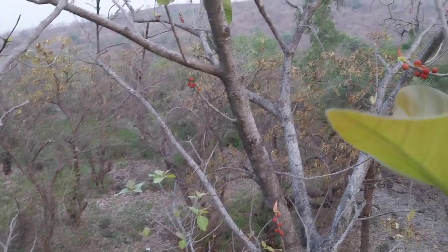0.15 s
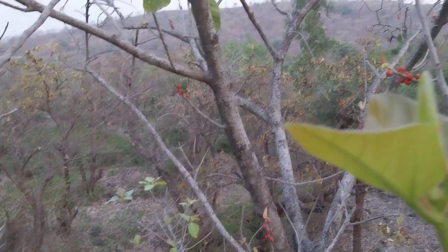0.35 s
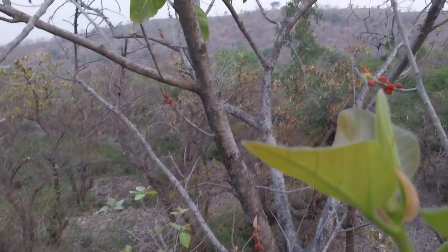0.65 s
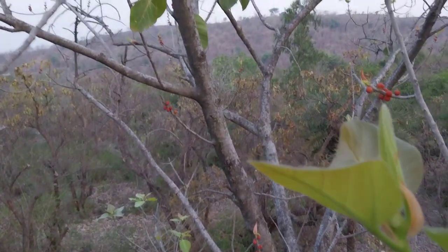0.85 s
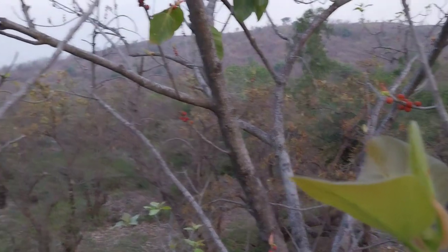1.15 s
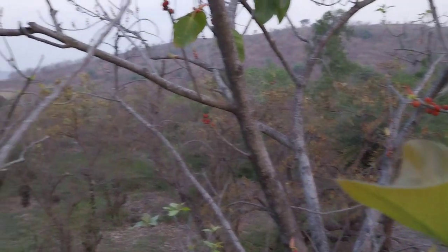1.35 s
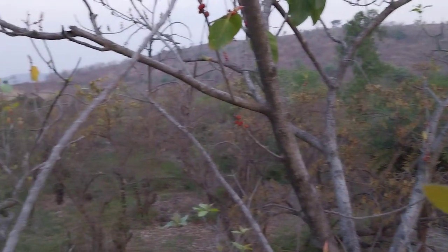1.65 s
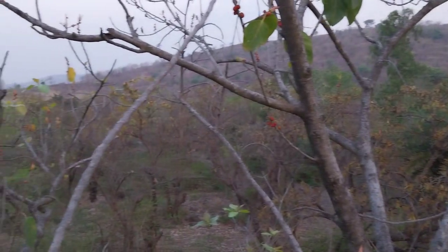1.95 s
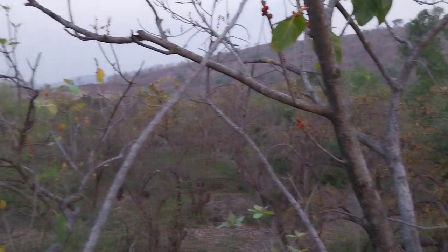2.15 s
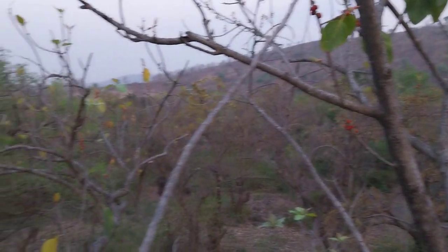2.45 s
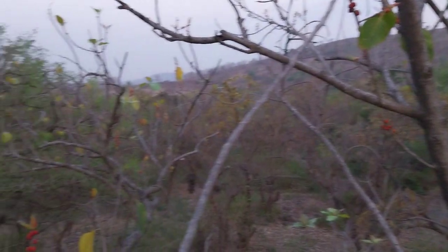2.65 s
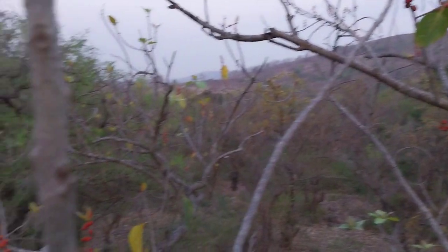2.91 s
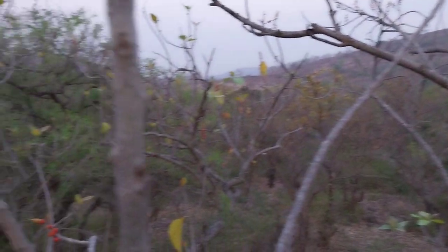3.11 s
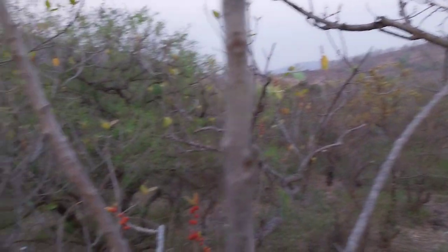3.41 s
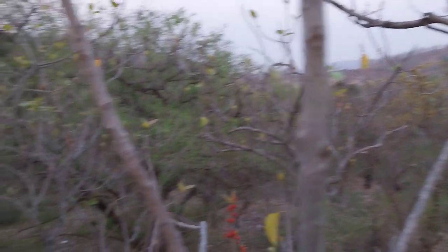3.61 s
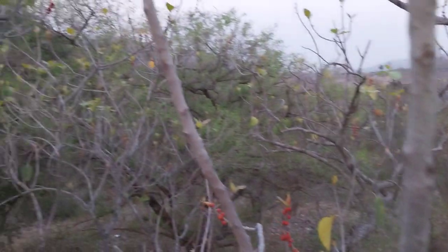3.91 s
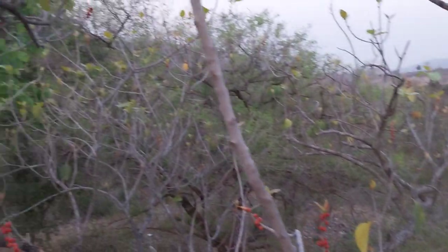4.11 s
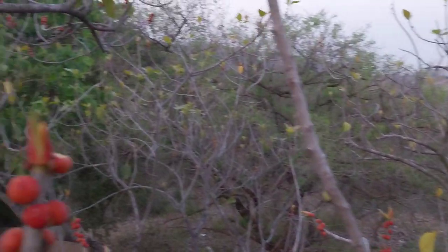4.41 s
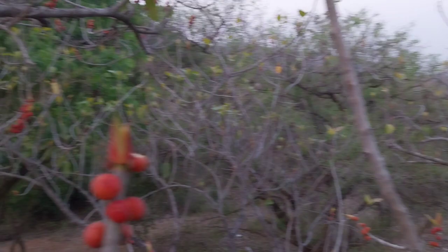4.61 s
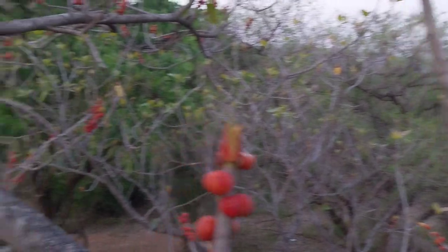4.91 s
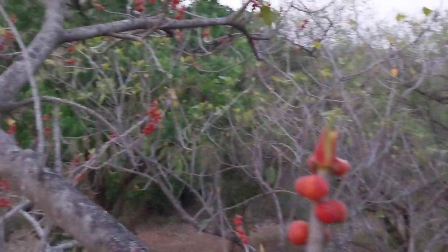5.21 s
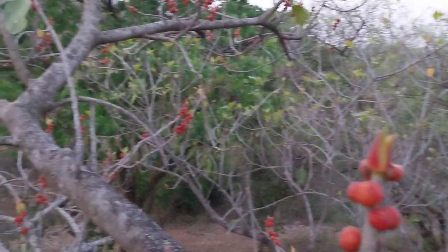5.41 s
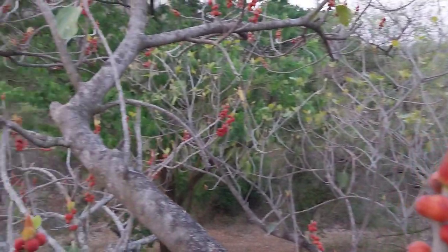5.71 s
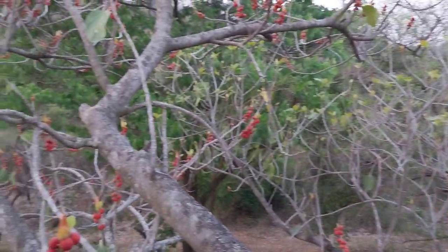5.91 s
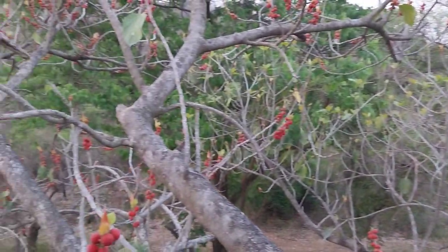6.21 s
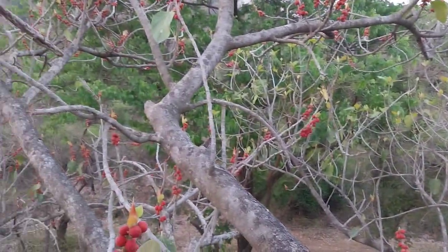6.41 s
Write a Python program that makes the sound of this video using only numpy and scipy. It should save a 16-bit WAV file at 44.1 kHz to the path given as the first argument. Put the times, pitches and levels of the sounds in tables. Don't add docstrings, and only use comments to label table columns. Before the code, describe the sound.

A near bird whistles five arched notes, then many small birds chirp over scrub woodland; later a finger rubs the microphone and taps click.

```python
import sys
import numpy as np
from scipy import signal
from scipy.fft import rfft, irfft, next_fast_len
from scipy.io import wavfile
from scipy.ndimage import uniform_filter1d, map_coordinates

SR = 44100
rng = np.random.default_rng(int(sys.argv[2]) if len(sys.argv) > 2 else 0)


def gain_from_db(level_db):
    decades = np.asarray(level_db, float) / 20
    return 10 ** decades


def wav_record(signal):
    frames = np.transpose(np.atleast_2d(signal))
    bounded = np.clip(frames, -1, 1)
    quanta = np.round(bounded * 32767).astype(np.int16)
    wavfile.write(sys.argv[1], SR, quanta)


N = 288855

# [f/Hz, level per Hz/dB]
AIR_COLOUR = [(15, -60), (30, -22), (45, -2), (72, 5.5), (216, 0.5), (371, -9), (1120, -18), (3050, -24),
              (3880, -5), (5980, -15), (7630, -21), (8270, -38), (9700, -33), (11100, -23), (15800, -31)]
# [t/s, peak level/dB]
PUFFS = [
    [(.018, -44), (.06, -45.5), (.097, -57), (.15, -42), (.179, -44.5), (.264, -55), (.89, -57),
     (4.91, -51.5), (4.943, -44), (4.978, -50.5), (5.04, -46.5), (5.085, -41), (5.108, -41.5), (5.132, -48),
     (5.15, -54), (5.176, -57), (5.34, -56.5), (5.229, -57), (5.259, -50), (5.291, -57)],
    [(.825, -52), (.971, -50), (1.033, -47.5), (1.086, -47), (1.125, -54), (2.86, -57), (4.996, -49.5),
     (5.029, -46.5), (5.062, -42), (5.245, -52), (5.47, -57), (6.22, -54)],
]
# [t/s, level/dB]
BREEZE = [
    (0, -59),
    (.3, -67),
    (.6, -73),
    (5.55, -91.5),
    (5.65, -73),
    (6.55, -74.5),
]
# [f/Hz, level per Hz/dB]
DRAUGHT_COLOUR = [(22, -20.5), (40, 4.5), (120, -1), (350, -5), (700, -20.5), (1500, -63.5)]
# [t/s, level/dB]
CHORUS = [(0, -54.5), (.6, -64.5), (1.0, -59.5), (1.6, -59.5), (2.4, -60), (3.0, -65.5), (3.25, -68),
          (3.5, -69.5), (3.9, -72), (4.02, -63.5), (4.55, -62), (5.0, -58), (5.45, -62.5), (5.9, -69),
          (6.1, -63.5), (6.55, -63)]
# [f/Hz, level per Hz/dB]
FLOCK_COLOUR = [(760, -76), (1300, -30.5), (1660, -3.5), (2840, -3.5), (3340, -11.5), (3740, -1),
                (5680, -15), (6180, -22), (8000, -58), (10400, -83), (17600, -120)]
# [f/Hz, time to fade by 60 dB/s]
TREES = [(500, 0.77), (2500, 0.5), (7000, 0.53), (12000, 0.037)]
GLIDES = {"rise": (.73, 1.29), "swoop": (.86, 1.38), "climb": (.85, 1.0), "lift": (.95, 1.03),
          "level": (1.01, 1.0), "arch": (.76, .82), "droop": (1.08, .95), "scoop": (1.3, .94),
          "fall": (1.3, .76), "drop": (1.1, .71), "coo": (.97, .98), "ascend": (.86, 1.14),
          "hump": (.94, .94), "slide": (1.18, .82), "dive": (1.55, .82), "tip": (1.02, .75),
          "settle": (1.4, .88)}
DOVE = {"coo": [(.3, 0.45, 606, -88.5), (.97, 0.051, 617, -77.5), (1.05, 0.55, 689, -87),
        (1.5, 0.3, 599, -85), (2.13, 0.081, 566, -77.5), (2.36, 0.058, 610, -73), (2.44, 0.05, 624, -79.5),
        (2.53, 0.071, 619, -75.5), (2.65, 0.056, 645, -81), (2.79, 0.072, 621.5, -77),
        (2.92, 0.074, 605, -80.5)]}
HOARSE = {"climb": [(1.471, 0.081, 2002, -53), (1.539, 0.061, 2147, -51), (6.075, 0.0374, 2532, -54.5),
          (6.312, 0.088, 1940, -58.5)], "lift": [(1.713, .032, 2014, -54), (2.201, .033, 2210, -56.5),
          (2.717, 0.088, 2346, -58.5), (6.421, 0.059, 2710, -63.5)], "level": [(2.04, 0.099, 1790, -72),
          (4.229, 0.16, 1822, -71), (5.21, 0.18, 2132, -64.5), (6.39, 0.093, 1767, -59.5),
          (3.3, .09, 2310, -68.5), (1.27, .09, 2250, -58), (1.38, .03, 3000, -58), (1.84, .06, 2250, -59),
          (3.98, .05, 2250, -64), (3.385, 0.032, 3200, -64.5), (4.085, 0.044, 2375, -71),
          (5.8, 0.047, 2103, -69.5), (6.524, .012, 2030, -58)], "droop": [(.985, 0.032, 3260, -52.5),
          (5.663, 0.079, 2780, -60)], "arch": [(1.68, 0.077, 2265, -60)], "scoop": [(1.6, .09, 1567, -66.5),
          (7.4, 0.066, 2200, -52), (3.3, .065, 3100, -62), (6.48, 0.073, 1430, -71)]}
THIN = {"arch": [(.252, .02, 5900, -66), (.8, .039, 5650, -59)], "climb": [(.792, 0.035, 5290, -59.5),
        (6.003, 0.045, 3580, -60)], "level": [(1.088, .028, 5500, -53), (.94, .028, 5400, -58),
        (2.117, 0.016, 6580, -54), (2.319, 0.017, 6500, -55.5), (2.883, 0.019, 5170, -49),
        (2.996, 0.014, 4350, -53), (3.165, .04, 4040, -61), (3.043, 0.011, 5200, -49),
        (5.065, 0.013, 5580, -53), (5.08, 0.015, 4020, -48), (5.635, 0.013, 5350, -54.5),
        (3.983, .02, 4470, -57), (5.75, 0.1, 3900, -75.5), (5.915, .06, 3760, -74)],
        "rise": [(2.87, 0.008, 6760, -64), (2.98, 0.0105, 6730, -60.5)],
        "swoop": [(6.374, .048, 4800, -63)], "droop": [(1.761, 0.082, 6610, -61), (5.648, .06, 3900, -57)]}
FAR_RIGHT = {"rise": [(2.687, 0.034, 3600, -60), (3.551, 0.073, 3280, -68)],
             "swoop": [(1.825, 0.027, 3000, -60), (3.133, 0.033, 2920, -64)],
             "climb": [(5.969, 0.084, 2550, -66)], "arch": [(.152, 0.028, 3850, -50)],
             "lift": [(.798, 0.049, 3820, -50.5), (2.192, .063, 3700, -64.5), (4.383, 0.023, 2742, -60.5)],
             "level": [(5.441, 0.013, 2580, -65), (5.869, 0.016, 1990, -59.5)],
             "droop": [(2.14, 0.013, 2190, -35), (2.871, 0.037, 2890, -64), (3.548, 0.0467, 3950, -66)],
             "scoop": [(1.573, 0.051, 3105, -58.5), (3.583, 0.056, 3225, -58)],
             "fall": [(.12, 0.041, 4840, -64), (4.412, 0.039, 3410, -52.5)],
             "tip": [(4.008, 0.026, 3337, -48.5)]}
SETTLING = {"settle": [(3.72, .1, 3075, -64.5)], "scoop": [(1.995, 0.087, 3010, -57)],
            "droop": [(3.835, .14, 3750, -71.5), (3.85, 0.13, 3066, -65.5)]}
RIGHT = {"rise": [(2.525, .074, 5000, -51.5), (2.732, 0.074, 4620, -46.5), (2.909, 0.019, 4400, -48.5),
         (3.021, 0.028, 4520, -54)], "swoop": [(2.232, .05, 2806, -66)],
         "climb": [(1.468, .075, 1931, -52.5), (1.853, 0.036, 2890, -56), (2.473, .037, 6760, -53),
         (2.679, .04, 6610, -54.5)], "level": [(2.168, 0.023, 2530, -52), (4.345, 0.031, 5510, -66.5),
         (5.523, 0.025, 4570, -69.5)], "droop": [(3.342, 0.036, 2780, -67), (5.116, 0.074, 3110, -72)],
         "scoop": [(2.413, 0.03, 3304, -56.5), (2.927, 0.015, 5480, -50.5)],
         "fall": [(2.076, 0.038, 2500, -58), (5.017, 0.014, 2770, -63)], "drop": [(5.29, 0.089, 3660, -64)]}
WAVERING = {"ascend": [(3.0, .028, 4990, -57)], "climb": [(.425, 0.027, 4240, -66.5),
            (6.012, 0.0355, 4850, -63.5)], "hump": [(.947, .02, 5480, -51.5), (1.09, 0.022, 5575, -50),
            (1.088, .012, 5250, -53), (1.1, .014, 5300, -53), (.936, .014, 5300, -59)],
            "arch": [(3.965, 0.022, 5780, -63)], "level": [(.54, 0.099, 4100, -66.5),
            (2.026, 0.01, 2200, -61.5), (2.768, 0.01, 2300, -54), (3.08, 0.027, 2720, -70.5),
            (4.052, .012, 3350, -66), (6.135, 0.036, 6200, -74), (4.26, 0.046, 1650, -70.5),
            (5.785, 0.024, 3020, -73)], "droop": [(.45, .06, 3980, -61.5), (3.137, 0.0254, 4210, -62.5),
            (3.78, .06, 4530, -75.5)], "slide": [(2.8, 0.036, 4900, -55), (2.838, 0.037, 3250, -56),
            (0.12, 0.036, 4250, -63.5)], "fall": [(3.2, 0.027, 3260, -62.5)],
            "dive": [(6.047, 0.032, 3180, -55)]}
# [t of hook/s, slur level/dB, hook level/dB]
PHRASES = [
    (1.722, -45, -41.5),
    (1.919, -46.5, -40.5),
    (2.123, -46.5, -42.5),
    (2.326, -49, -43),
]
AHEAD = {"droop": [(.487, 0.051, 3840, -47.5), (5.61, 0.027, 4140, -59), (6.465, 0.09, 4450, -62.5)],
         "lift": [(4.151, .12, 5770, -69.5), (6.119, 0.058, 2930, -56)]}
# [t of peak/s, level up/dB, level down/dB]
SPIRES = [
    (1.218, -43, -47.5),
    (1.376, -41, -43),
    (1.525, -45.5, -45.5),
]
# [t/s, peak level/dB, extra level of the knock/dB, left over right/dB]
TICKS = [
    (5.034, -42, -17, 19),
    (5.083, -64, 11, 13),
    (5.261, -66.5, 8.5, 4),
    (5.6063, -33.5, 10.5, 43),
    (6.2072, -66, 6, 14),
]
# [t/s, length/s, level/dB]
SCRATCHES = [
    (6.204, .02, -41),
    (5.608, .005, -41),
    (5.031, .003, -45),
    (5.32, .04, -68),
    (5.47, .06, -70),
]
# [f/Hz, width/Hz, level/dB]
SHELL = [(370, 220, -9), (1940, 330, 10.5), (3450, 860, 9.5), (5250, 1170, 8), (12460, 3700, -7.5)]
# [t/s, level/dB]
RUB = [
    (4.585, -64),
    (4.6, -49.5),
    (4.65, -46.5),
    (4.68, -35.5),
    (4.765, -28.5),
    (4.81, -33.5),
    (4.9, -37.5),
    (4.96, -35),
    (4.985, -52),
]
# [t/s, level/dB]
DRAG = [
    (4.999, -57.5),
    (5.04, -48.5),
    (5.09, -60.5),
    (5.13, -68),
]
# [f/Hz, level per Hz/dB]
SKIN_COLOUR = [(88, -21), (150, -12), (438, -13), (532, -17), (598, -13), (2080, 0.5), (3740, 0),
               (5520, 2.5), (8470, -7.5), (11800, 4), (15800, 3.5)]
# [t/s, top f/Hz, level/dB]
WHISTLES = [
    (.010, 2640, -41),
    (0.346, 2591, -39),
    (.668, 2568, -39),
    (0.972, 2535, -39.5),
    (1.239, 2601, -42),
]
# [multiple of the pitch, level/dB]
OVERTONES = [(2, -43.5), (3, -45.5), (5, -41.5), (6, -49)]
STRAIN = [(-0.5, 3, 8), (4, 8.5, 1), (-0.5, -7, 1), (-2.5, -8, 0), (-2.5, -6, 3.5)]
# [share of length, level/dB]
EFFORT = [(0, -15.5), (.1, -1.5), (.38, -0.5), (.5, 0.5), (.75, 0), (1, 0)]
CATCHES = [.056, .417, .748, 1.06, 1.29]
# [t/s, top f/Hz, level/dB]
FLICKS = [
    (0.188, 3420, -44.5),
    (.514, 3530, -45),
    (.835, 3570, -45.5),
    (1.122, 3585, -47.5),
    (1.377, 3210, -49.5),
]
# [f/Hz, level per Hz/dB]
CONVERTER_COLOUR = [(1500, -45.5), (4000, -10.5), (7300, -1.5), (8300, -41), (9700, -28), (11500, -7.5),
                    (15500, -5.5)]


def unit(x):
    return x / np.sqrt(np.mean(x ** 2) + 1e-20)


def along(points, hz):
    f, v = np.transpose(points)
    return np.interp(np.log(hz + 1), np.log(f + 1), v)


def curve(rows):
    s, values = np.transpose(rows)
    return np.interp(np.arange(N) / SR, s, values)


def gate(rows, edge):
    start, end = rows[0][0], rows[-1][0]
    return np.interp(np.arange(N) / SR, [start, start + edge, end - edge, end], [0, 1, 1, 0])


def wobble(rate):
    knots = rng.standard_normal(int(N * rate / SR) + 4)
    return map_coordinates(knots, [np.arange(N) * rate / SR])


def filtered(x, response):
    m = next_fast_len(N + SR // 2)
    return irfft(rfft(x, m) * response(np.fft.rfftfreq(m, 1 / SR)), m)[..., :N]


def coloured(x, spectrum):
    return unit(filtered(x, lambda hz: gain_from_db(along(spectrum, hz))))


def noise():
    return rng.standard_normal((2, N))


def placed(x, pan_db, lag=0):
    left, right = np.broadcast_to(x, (2, N))
    return np.array([np.roll(left, round(lag)), right]) * gain_from_db([[pan_db / 2], [-pan_db / 2]])


def scattered(x, wet_db):
    hz, t, z = signal.stft(rng.standard_normal((2, SR // 2)), SR, nperseg=256)
    twigs = gain_from_db(-60 * t / 0.11)
    trunks = gain_from_db(0.5 - 60 * t / along(TREES, hz)[:, None])
    tail = signal.istft(z * (twigs + trunks), SR, nperseg=256)[1]
    tail = np.pad(tail / np.linalg.norm(tail[0]), [(0, 0), (220, 0)])
    return x + gain_from_db(wet_db) * signal.fftconvolve(x, tail, axes=1)[:, :N]


def chirps(rows, edge, flutter_db, rate=120, waver=0, bend=1):
    out = np.zeros(N + SR)
    shake = np.pad(1 + waver * wobble(700), (0, SR))
    for s, length, start_hz, mid_hz, end_hz, db in rows:
        u = np.linspace(0, 1, int(length * SR))
        v = u ** bend
        hz = 2 * start_hz * (v - .5) * (v - 1) - 4 * mid_hz * v * (v - 1) + 2 * end_hz * v * (v - .5)
        swell = np.sin(np.pi / 2 * np.clip(np.minimum(u, 1 - u) / edge, 0, 1))
        span = slice(round(s * SR), round(s * SR) + len(u))
        phase = 2 * np.pi * np.cumsum(hz * shake[span]) / SR
        out[span] += gain_from_db(db) * swell * np.sin(phase)
    return out[:N] * gain_from_db(flutter_db * wobble(rate))


def notes(table):
    rows = []
    for kind, calls in table.items():
        first, last = GLIDES[kind]
        rows += [(s, length, first * hz, hz, last * hz, db) for s, length, hz, db in calls]
    return rows


def paired(first, second, rows, sag):
    befores, afters = [], []
    for s, first_db, second_db in rows:
        tired = 1 - sag * (s - rows[0][0])
        befores.append((s - first[0], first[0], *(np.array(first[1:]) * tired), first_db))
        afters.append((s, second[0], *(np.array(second[1:]) * tired), second_db))
    return befores, afters


def air():
    return gain_from_db(-67.5) * coloured(noise(), AIR_COLOUR)


def wind():
    out = np.zeros((2, N + SR))
    t = np.linspace(-.04, .04, int(.08 * SR))
    for port, puffs in enumerate(PUFFS):
        for (s, db), (pitch, turn) in zip(puffs, rng.random((len(puffs), 2))):
            hz = 64 - 14 * port + 55 * pitch
            push = np.exp(-(t / .0068) ** 2) * np.cos(2 * np.pi * (hz * t + turn))
            out[port, round(s * SR):][:len(t)] += gain_from_db(db + 4.0) * push
    thumps = out[:, len(t) // 2:][:, :N]
    gusts = gain_from_db(curve(BREEZE) + 4.5 * wobble(24))
    return thumps + placed(gusts * coloured(noise(), DRAUGHT_COLOUR), pan_db=-2.5)


def flock(count=1500):
    draw = rng.random((count, 5))
    start_s, length_s = draw[:, 0] * N / SR, .015 + .035 * draw[:, 1]
    mid_hz = 2100 * 3.1 ** draw[:, 2]
    glide = 1 + .5 * (draw[:, 3] - .5)
    db = along(FLOCK_COLOUR, mid_hz) + 8 * draw[:, 4]
    rows = zip(start_s, length_s, mid_hz / glide, mid_hz, mid_hz * glide, db)
    patter = placed(chirps(rows, edge=0.074, flutter_db=-3.5), pan_db=-8.5)
    blur = scattered(patter, wet_db=4.0)
    hiss = placed(coloured(noise(), FLOCK_COLOUR), pan_db=-8.0)
    return gain_from_db(curve(CHORUS)) * (unit(blur) + gain_from_db(-12.0) * hiss)


def dove():
    coos = chirps(notes(DOVE), edge=0.34, flutter_db=7.0)
    return scattered(placed(coos, pan_db=-10.5), wet_db=-3.5)


def scolders():
    chop = unit(wobble(330)) + .8
    calls = chirps(notes(HOARSE) + notes(THIN), edge=.25, flutter_db=3, rate=60, waver=.04)
    return scattered(placed(chop * calls, pan_db=-7.5, lag=-1), wet_db=-2.0)


def birds_far_right():
    far = chirps(notes(FAR_RIGHT), edge=0.15, flutter_db=6.0)
    far += chirps(notes(SETTLING), edge=0.044, flutter_db=3.5, bend=0.74)
    return scattered(placed(gain_from_db(-5.0) * far, pan_db=-16.0, lag=-3), wet_db=-6.0)


def phrases():
    slur, hook = (.09, 3450, 4720, 5020), (.036, 5300, 6450, 4300)
    return paired(slur, hook, PHRASES, sag=0.0507)


def birds_right(slurs):
    clear = chirps(notes(RIGHT), edge=0.3, flutter_db=4, rate=200)
    clear += chirps(notes(WAVERING), edge=0.3, flutter_db=4, rate=200, waver=.012)
    clear += chirps(slurs, edge=0.43, flutter_db=4.0, bend=.6)
    return scattered(placed(gain_from_db(4) * clear, pan_db=-5.5, lag=-1), wet_db=-2)


def birds_ahead(hooks):
    up, down = (.049, 5150, 5750, 7450), (0.048, 7770, 6250, 5800)  # length/s, start, middle, end f/Hz
    ups, downs = paired(up, down, SPIRES, sag=0.13)
    calls = chirps(ups + downs + notes(AHEAD), edge=0.22, flutter_db=3.5)
    calls += chirps(hooks, edge=0.22, flutter_db=2, bend=0.78)
    return scattered(placed(gain_from_db(3.5) * calls, pan_db=-0.5, lag=-5.5), wet_db=-8.0)


def shell_ring(modes):
    def response(f):
        return sum((-1) ** k * gain_from_db(db) * 1j * f * width / (centre * centre - f * f + 1j * f * width)
                   for k, (centre, width, db) in enumerate(modes))
    return response


def ticks():
    sharp, knock = np.zeros((2, N)), np.zeros((2, N))
    for s, db, knock_db, pan_db in TICKS:
        i = round(s * SR) + 62
        port_db = db - np.array([0, pan_db])
        sharp[:, i] = gain_from_db(port_db + 14.5)
        knock[:, i] = gain_from_db(port_db + knock_db + 17.0)
    for s, length, db in SCRATCHES:
        n = int(length * SR)
        grit = rng.standard_normal((2, n)) * gain_from_db([[db], [db - 28]] - np.linspace(0, 9, n))
        sharp[:, round(s * SR):][:, :n] += grit[:, :N - round(s * SR)]
        knock[:, round(s * SR):][:, :n] += gain_from_db(3.5) * grit[:, :N - round(s * SR)]
    return filtered(knock, shell_ring(SHELL[:-1])) + filtered(sharp, shell_ring(SHELL[-1:]))


def finger():
    t = np.arange(N) / SR
    stroking = t < RUB[-1][0]
    press_s, light_db, pressed_db = 4.65, -54, -17.5
    pressed = np.clip((t - press_s) / 0.038, 0, 1)
    hiss_db = np.where(stroking, 5 - 37.5 * np.abs(t - RUB[0][0]), -11.5)
    stroke_body_db = light_db + pressed * (pressed_db - light_db - 27.5 * (t - press_s))
    body_db = np.where(stroking, stroke_body_db, -11.5)
    spikes_db = 3.2 * np.minimum(rng.exponential(size=(2, N)), 3.8) + 0.2 * wobble(360)
    rub = coloured(noise() * gain_from_db(spikes_db), SKIN_COLOUR)
    body = filtered(rub, lambda hz: 1 / (1 + (hz / 1900) ** 6))
    hiss = filtered(rub, lambda hz: 1 / (1 + (8200 / (hz + 1)) ** 12))
    near = unit(rub - body - hiss)
    near = near + gain_from_db(hiss_db + [[0], [1]]) * unit(hiss) + gain_from_db(body_db + 9) * unit(body)
    port_db = curve(RUB + DRAG) - [[0], [34]]
    return gain_from_db(port_db) * gate(RUB + DRAG, edge=.012) * near


def whistler():
    out = np.zeros(N)
    beat_hz = 98
    beat_db = 1.5 * wobble(beat_hz)
    for (s, top_hz, db), (flick_s, *_), catch_s, more in zip(WHISTLES, FLICKS, CATCHES, STRAIN):
        length = flick_s + .005 - s
        u = np.linspace(0, 1, int(length * SR))
        span = slice(round(s * SR), round(s * SR) + len(u))
        late = s + u * length - catch_s
        start_hz, end_hz = .84 * top_hz, (.893 + 0.045 * s) * top_hz
        rise = 1 - (1 - np.clip(u / 0.22, 0, 1)) ** 2.1
        sink = 1 - np.exp(-(np.clip(late + 0.011, 0, 1) / .045) ** 1.37)
        hz = start_hz + (top_hz - start_hz) * rise - (top_hz - end_hz) * sink
        phase = 2 * np.pi * np.cumsum(hz) / SR
        echo_turns = beat_hz * np.clip(late - .003, 0, 1) * (0.84 + 4 * late)
        echo = 0.59 * np.exp(np.minimum(late / 0.0085, -late / 0.08) + 2j * np.pi * echo_turns)
        tone = np.abs(1 - echo) * np.sin(phase)
        for strain_db, (multiple, level) in zip([0, *more], OVERTONES):
            tone += gain_from_db(strain_db + level + 8.5) * np.sqrt(u) * np.sin(round(multiple) * phase)
        edges = np.clip(np.minimum(u / 0.0052, (1 - u) / 0.031), 0, 1)
        effort_db = np.interp(u, *np.transpose(EFFORT)) + np.sin(np.pi * u ** 2) * beat_db[span]
        out[span] += gain_from_db(db + 3.5 + effort_db) * edges * tone
    flicks = [(s, .018, .67 * hz, hz, .8 * hz, db) for s, hz, db in FLICKS]
    out += gain_from_db(5.5) * chirps(flicks, edge=0.069, flutter_db=4.0)
    return scattered(placed(out, pan_db=-9.5, lag=2), wet_db=-10.5)


def scene():
    slurs, hooks = phrases()
    background = air() + wind() + flock() + dove() + scolders()
    singers = birds_far_right() + birds_right(slurs) + birds_ahead(hooks)
    return background + singers + ticks() + finger() + whistler()


def top_cut(x):
    return signal.sosfilt(signal.butter(12, 16530, fs=SR, output="sos"), x)


def record(dry):
    loudness = np.sqrt(np.abs(uniform_filter1d(dry ** 2, size=1500)))
    noisy = dry + gain_from_db(-34.5) * loudness * coloured(noise(), CONVERTER_COLOUR)
    mix = filtered(noisy, lambda hz: hz < 15830)
    return top_cut(mix)


dry = scene()
out = record(dry)
wav_record(out)
```